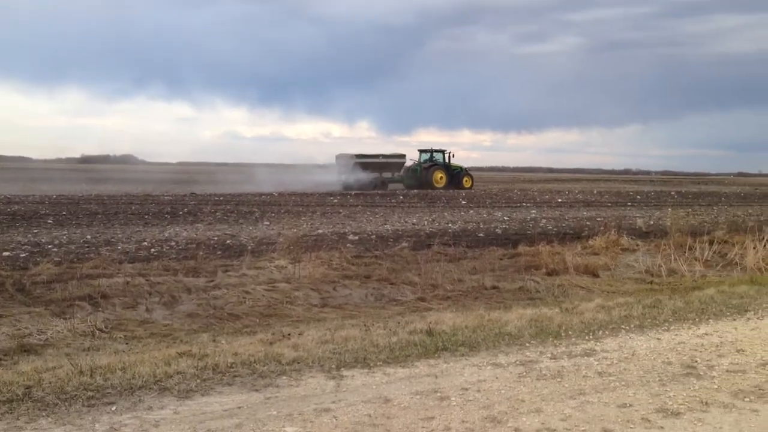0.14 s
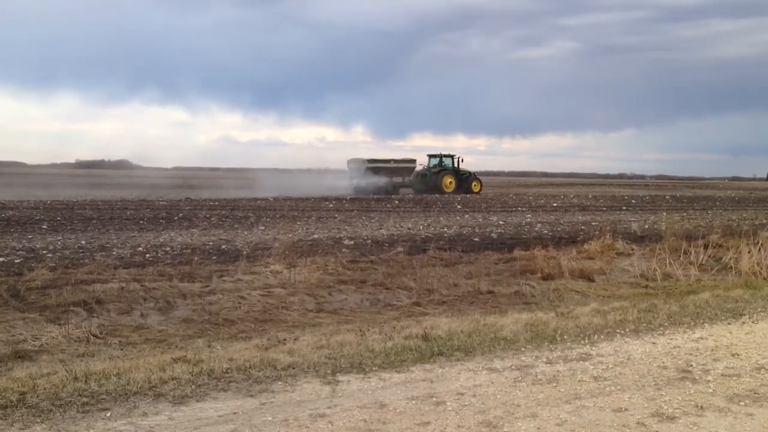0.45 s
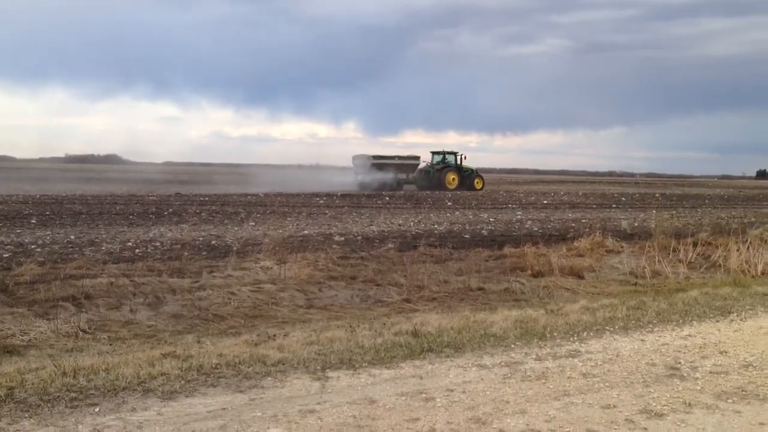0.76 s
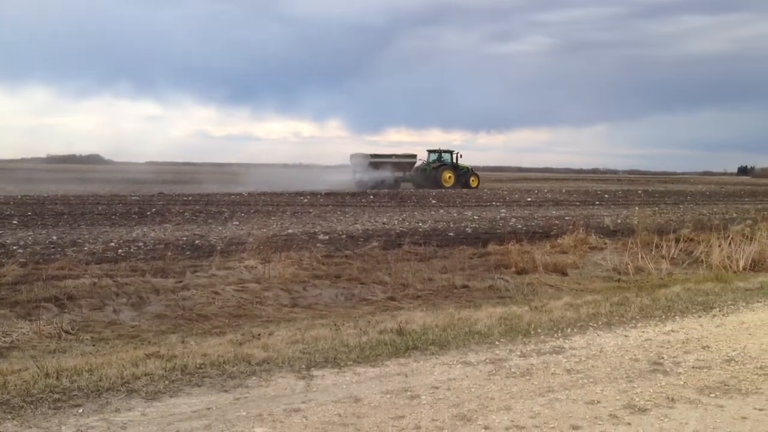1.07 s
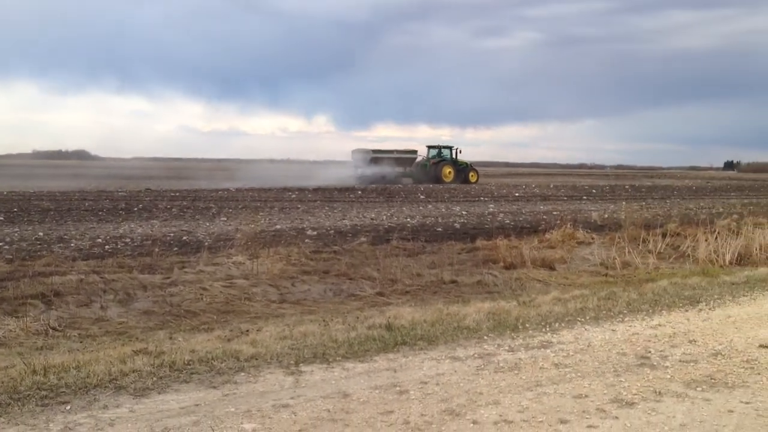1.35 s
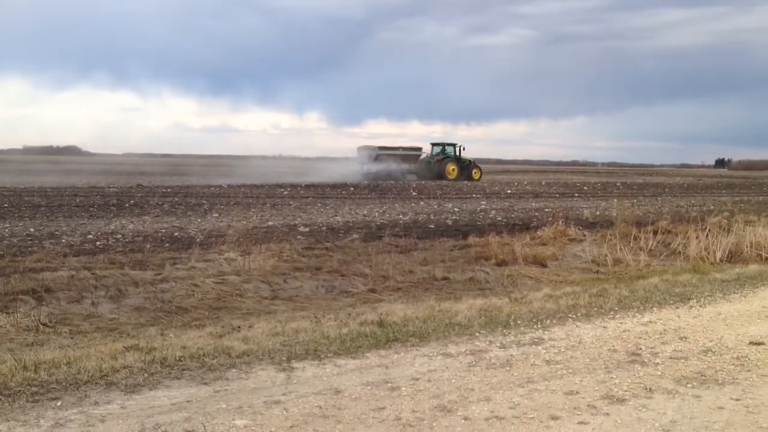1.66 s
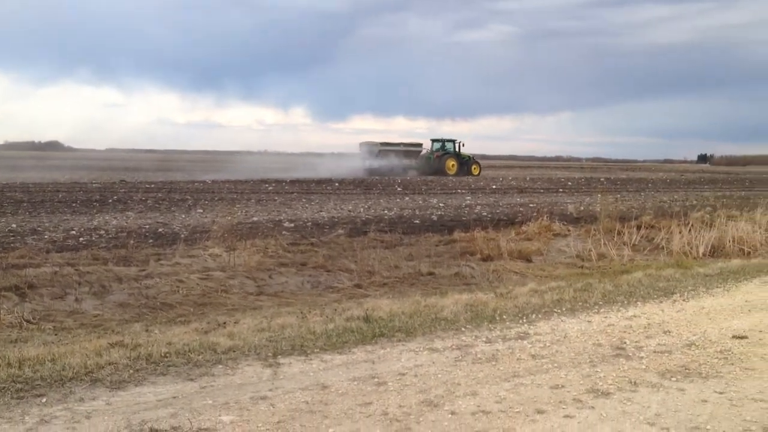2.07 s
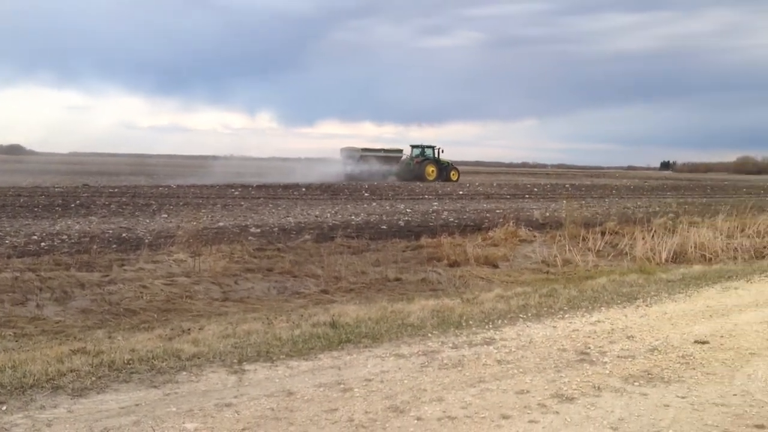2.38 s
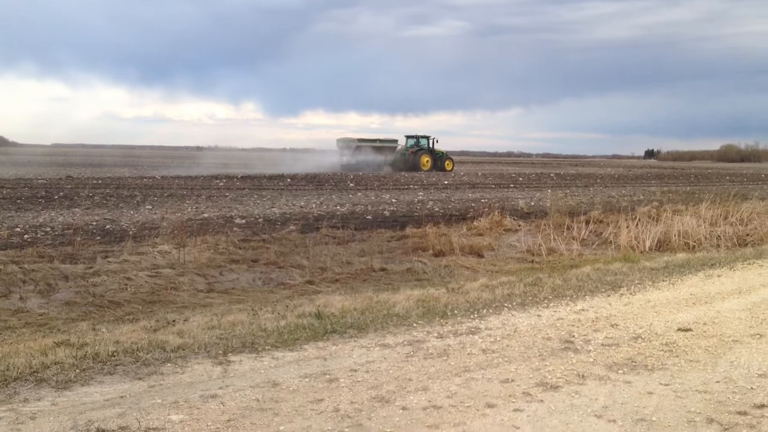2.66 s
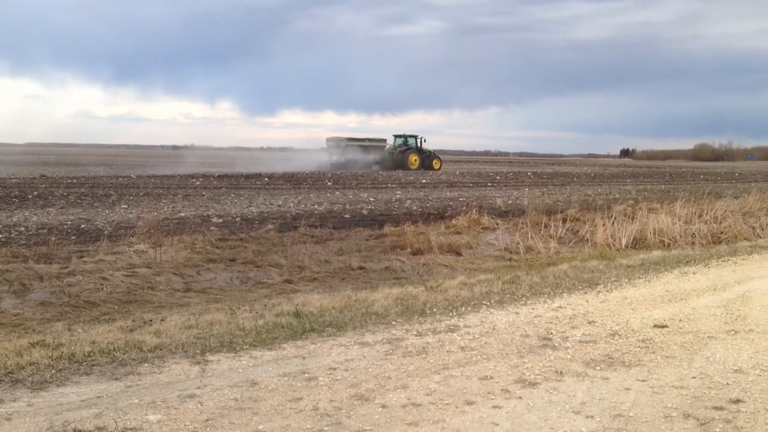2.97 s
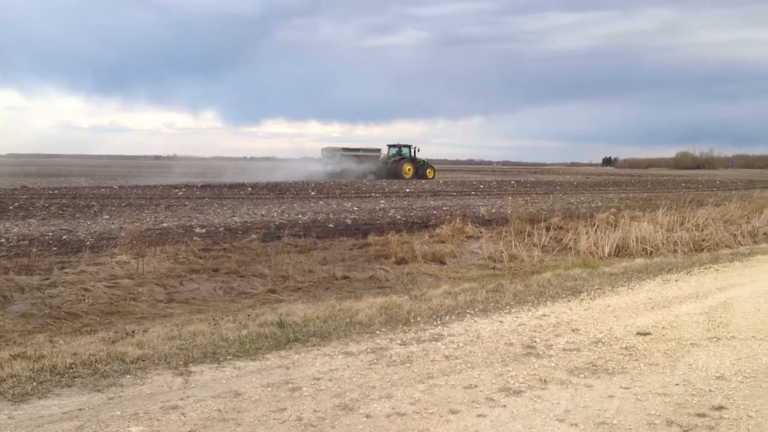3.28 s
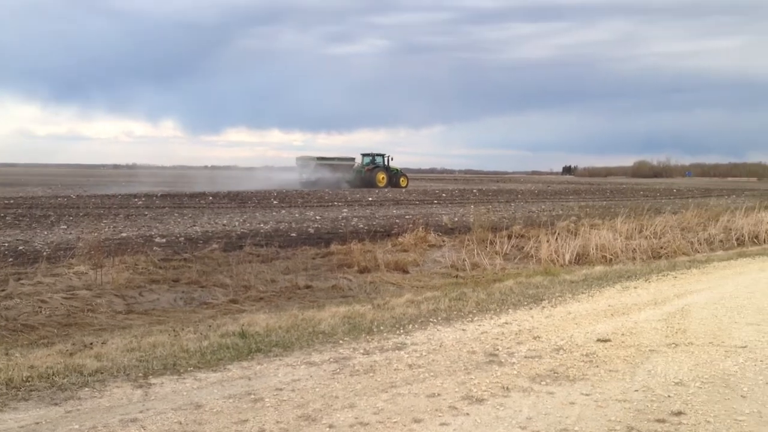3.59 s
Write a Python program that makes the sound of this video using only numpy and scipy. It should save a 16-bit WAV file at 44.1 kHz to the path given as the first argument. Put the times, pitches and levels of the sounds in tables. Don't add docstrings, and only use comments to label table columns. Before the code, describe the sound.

Steady wavering tractor engine roar heard from a distance outdoors, with fluttering high gear whine and spinning-disc hiss from the towed spreader; irregular soft wind thumps knock the microphone throughout, with no echo.

```python
import sys
import numpy as np
from scipy import signal
from scipy.fft import rfft, irfft
from scipy.io import wavfile
from scipy.ndimage import uniform_filter1d

SR = 44100
rng = np.random.default_rng(int(sys.argv[2]) if len(sys.argv) > 2 else 0)


def makeup_ratio(level_db):
    decades = np.asarray(level_db, float) / 20
    return 10 ** decades


def int16_out(signal):
    q = np.round(np.clip(np.atleast_2d(signal).T, -1, 1) * 32767)
    wavfile.write(sys.argv[1], SR, q.astype(np.int16))


N = 164493

# t/s, level/dB
CARRY_DB = [(0.05, -37), (0.33, -37), (1.14, -37.5), (1.33, -38.5), (3.67, -39.5), (3.68, -39)]


def engine(speed):
    cycle_hz = 14.82
    # multiple of the cycle, level/dB
    orders = [(6, -71), (8, -78), (9, -45.5), (10, -48), (11, -54.5), (12, -44.5), (15, -60), (24, -70.5)]
    # t/s, level/dB, tilt toward the upper orders/dB
    exhaust = [(0, -4, -12), (.15, -4, 0.5), (.35, -5.5, 6), (.6, -3, -3), (.8, 2.5, -1.5), (1.0, -1, -0.5),
               (1.25, -3, -1.5), (1.5, 3.5, 0.5), (1.75, -3, 2.5), (1.95, -1, -1.5), (2.15, -1.5, -4),
               (2.4, 2, -2), (2.65, -4, -0.5), (2.85, -2.5, -7), (3.05, 0, -6), (3.25, 3.5, 2),
               (3.5, 1.5, -3), (3.73, 2, 4.5)]
    # f/Hz, density/dB per Hz
    rumble_colour = [(15, -72), (25, -35), (70, -15.5), (108, -3), (146, 7.5), (211, 6), (252, -3.5),
                     (301, -10.5), (520, -16), (680, -70), (1140, -120)]
    # f/Hz, density/dB per Hz
    roar_colour = [(290, -7), (500, -14), (551, -10), (730, 0), (810, -0.5), (1000, 0.5), (1790, -5.5),
                   (2190, -2.5), (2950, -20.5), (3840, -35), (6490, -120)]
    time_s, note_db, tilt_db = np.array(exhaust).T

    def shift_db(order):
        tilted_db = note_db + tilt_db * np.clip((order - 10.5) / 1.5, -1, 1)
        return np.interp(np.arange(N) / SR, time_s, tilted_db)

    drone = sum(tone(cycle_hz * order * speed, db + shift_db(order), waver_db=1.5, blur_hz=1.503, rate_hz=15)
                for order, db in orders)
    rumble = bands(rumble_colour, -42.5, flicker_db=1.5, rate_hz=12, swell_db=-0.45)
    roar = bands(roar_colour, -40.5, flicker_db=0.82, rate_hz=6.71, swell_db=0.5)
    noise = rumble * makeup_ratio(0.2 * shift_db(11.4)) + roar
    return drone + dips(noise, [(510, 70, -4)])


def spreader(speed, t):
    # multiple, level/dB
    pump = [(1, -46), (2, -68), (3, -55.5), (4, -53), (5, -60)]
    # t/s, level/dB
    pump_load = [(0, -3), (1.3, -1.4), (1.75, -0.5), (2.4, -1.5), (3.0, -1.5), (3.2, -4), (3.73, -8.5)]
    # f/Hz, level/dB, drift/dB per s
    drive_line = [(715.6, -57, -.3), (1125.6, -57, -1.2), (1163, -61, .3), (1433, -64, .1), (1561, -59, .6),
                  (1672, -64, -.5), (1790, -60, -1.5), (2042, -63, .1), (2150, -63, .1), (2316, -62, .1)]
    # f/Hz, best level/dB, best heard t/s, fall/dB per s
    gear_whine = [(3104, -66, .9, 1.5), (3237, -57.5, .85, 7), (3630, -60, 1.9, 2), (3829, -61, 1.6, 2.5),
                  (4019, -60, 1.5, 2), (4417, -62.5, 1.6, 1), (4627, -67, 2, 1), (5050, -67, 3.65, 1.6),
                  (5270, -74, 2, 0), (5973, -74, .55, 1)]
    # start/s, length/s, level/dB
    high_bursts = [(0.317, 0.056, -55), (0.556, 0.12, -52), (0.694, 0.13, -53), (0.8, 0.09, -48.5),
                   (0.909, 0.057, -50.5), (1.015, 0.043, -49), (1.133, 0.043, -62), (1.185, 0.09, -53.5),
                   (1.358, 0.036, -68), (1.406, 0.061, -52.5), (1.49, 0.098, -49), (1.638, 0.051, -58),
                   (1.718, 0.029, -44.5), (1.777, 0.069, -53.5), (1.837, 0.047, -53), (1.889, 0.033, -68),
                   (1.929, 0.047, -56), (1.995, 0.043, -55), (2.105, 0.029, -66), (2.29, 0.05, -53),
                   (2.4, 0.072, -55), (2.498, 0.036, -66), (2.546, 0.04, -50.5), (2.661, 0.036, -56),
                   (2.75, 0.19, -51), (2.957, 0.042, -53), (3.087, 0.032, -51), (3.324, 0.032, -57),
                   (3.38, 0.047, -53.5), (3.452, 0.049, -50.5)]
    # start/s, length/s, level/dB
    low_bursts = [(0.01, 0.056, -52), (0.135, 0.051, -53), (0.23, 0.054, -57), (0.31, 0.033, -50),
                  (0.367, 0.047, -46.5), (0.495, 0.024, -42), (0.55, 0.029, -54), (0.605, 0.065, -46),
                  (0.69, 0.045, -52), (0.76, 0.048, -51), (.84, 0.051, -51), (.95, .05, -61),
                  (1.04, 0.073, -59), (1.217, 0.046, -53), (1.348, 0.032, -52), (1.5, 0.028, -48),
                  (1.558, 0.051, -49)]
    # start/s, length/s, level/dB
    thin_bursts = [
        (.6, 0.12, -68),
        (1.48, .09, -78),
        (2.27, .14, -71),
        (2.7, 0.27, -70),
        (2.96, 0.093, -62.5),
        (3.44, 0.084, -70),
    ]
    # f/Hz, density/dB per Hz
    disc_colour = [(1680, -40), (2850, -16.5), (3340, -1), (3840, -2.5), (4310, 0), (4850, -9.5),
                   (5910, -17), (6790, -27), (8000, -34), (10400, -46), (17600, -120)]
    # t/s, level/dB
    treble = [(0.05, -46.5), (0.45, -43), (2.02, -41), (2.2, -45), (2.92, -42), (2.93, -43), (3.68, -49)]

    pump_hz, load_db = 249.7, curve(pump_load)
    hum = sum(tone(pump_hz * k * speed, db + load_db / k, min(1.3 * k, 2.4), 1.3 * k, 10 + 6 * k)
              for k, db in pump)
    drive = sum(tone(hz * speed, db - 1.5 + drift * (t - t.mean()), 4, 4, 14) for hz, db, drift in drive_line)
    gears = sum(tone(hz * speed, db - fall * np.abs(t - best_s), 3, 9, 34)
                for hz, db, best_s, fall in gear_whine)

    high = tone(4211 * speed, bursts(high_bursts, -60.5, t), 1.8, 7, 52)
    low = tone(3447 * speed, bursts(low_bursts, -60 - 10 * t, t), 2, 8, 45)
    thin = tone(5731 * speed, bursts(thin_bursts, -79, t), 2, 9, 40)
    whines = (high + low + thin) / makeup_ratio(curve(CARRY_DB))

    discs = bands(disc_colour, -50, flicker_db=0.9, rate_hz=20, swell_db=0.3)
    top = signal.sosfiltfilt(signal.butter(3, 4900, "high", fs=SR, output="sos"), discs)
    treble_db = curve(treble)
    hiss = makeup_ratio(0.77 * treble_db) * (discs - top) + makeup_ratio(0.12 * treble_db) * top
    return hum + drive + whines + makeup_ratio(-0.1) * gears + hiss


def wind():
    # t/s, peak/dB, width/ms, push 1 or pull -1
    bumps = [(0.1933, -18.3, 1.35, 1), (0.4125, -22.5, 0.99, 1), (0.4802, -19, 0.84, -1),
             (0.5008, -17.5, 1.35, 1), (0.6919, -31, 0.63, -1), (0.7294, -24, 1.35, -1),
             (0.869, -19.5, 0.84, 1), (0.896, -17.5, 1, 1), (0.9043, -24, 1.2, 1), (0.9067, -26, 0.62, 1),
             (0.9254, -24, 0.94, 1), (0.9288, -17.5, 0.85, 1), (0.9369, -32.0, 0.4, 1),
             (0.9408, -27, 0.81, 1), (0.948, -18, 1.04, -1), (1.0661, -27.1, 0.68, -1),
             (1.1145, -18, 0.81, 1), (1.122, -27, 0.44, 1), (1.133, -20.5, 0.66, -1),
             (1.2569, -21, 0.97, 1), (1.5405, -25, 1.6, -1), (1.5773, -27, 0.98, -1), (1.5978, -33, 0.4, 1),
             (1.6639, -23, 1.2, -1), (1.6947, -27, 0.4, 1), (1.7128, -15, 0.9, -1), (1.7245, -33, 0.37, -1),
             (1.7615, -21, 1, 1), (1.785, -24, 0.88, 1), (1.7919, -24.2, 0.86, -1),
             (1.852, -22.5, 0.54, -1), (1.8549, -21, 1.2, -1), (1.8723, -21, 0.8, -1),
             (1.9233, -26.5, 0.7, 1), (2.3722, -41, 0.36, -1), (2.3751, -13.5, 0.9, -1),
             (2.3938, -25, 1.1, 1), (2.5422, -24, 1.1, -1), (2.5615, -26, 0.99, -1), (2.7094, -26, 0.75, 1),
             (2.7327, -21.5, 0.94, 1), (2.835, -18.5, 0.78, -1), (2.8809, -22, 0.8, 1),
             (3.3554, -20.5, 0.91, -1), (3.3935, -26, 1.2, 1), (3.4732, -21, 1.24, -1),
             (3.5571, -21, 1.9, 1), (3.6253, -19, 1.3, -1)]
    small_per_s, small_db, small_spread_db = 22, -40, 2.2
    gain_db, port_hz = -0.5, 130

    wait, strength, shape = rng.random((400, 3)).T
    small_s = np.cumsum(-np.log(1 - wait)) / small_per_s
    eddies = list(bumps)
    for s, a, b in zip(small_s, strength, shape):
        peak_db = small_db - small_spread_db * np.log(1 - a)
        eddies.append((s, peak_db, 0.5 + 0.5 * b, b % 0.1 - 0.05))

    press, near = np.zeros(N + 2000), np.arange(-400, 400)
    for s, db, width_ms, push in eddies:
        at = s * SR
        if at < N:
            x = (near - at % 1) / (max(width_ms, 0.38) * SR / 1000)
            press[int(at) + near] += np.sign(push) * makeup_ratio(db + gain_db) * np.exp(-x ** 2 / 2)
    quick = press[:N] - uniform_filter1d(press, int(SR / 90))[:N]
    return signal.sosfilt(signal.butter(4, port_hz, "high", fs=SR, output="sos"), quick)


def tone(hz, db, waver_db, blur_hz, rate_hz):
    phase = 2 * np.pi * np.cumsum(hz + blur_hz * walk(rate_hz)) / SR + 2 * np.pi * rng.random()
    gain = makeup_ratio(waver_db * walk(rate_hz))
    gain = gain / np.sqrt(np.mean(gain ** 2))
    return np.sqrt(2) * makeup_ratio(db) * gain * np.sin(phase)


def bands(colour, db, flicker_db, rate_hz, swell_db):
    f = np.fft.rfftfreq(N, 1 / SR) + 1
    hz, per_hz_db = np.array(colour).T
    shape = makeup_ratio(np.interp(np.log(f), np.log(hz), per_hz_db, left=-200, right=-200))
    noise = rfft(rng.standard_normal(N)) * shape
    out, shared = 0, walk(4.5)
    for centre in np.arange(np.log2(20), np.log2(SR / 2), 1 / 3):
        if hz[0] / 1.3 < 2 ** centre < hz[-1] * 1.3:
            window = np.cos(np.pi / 2 * np.clip(3 * (np.log2(f) - centre), -1, 1)) ** 2
            shared = 0.8 * shared + 0.6 * walk(2.5)
            out = out + irfft(noise * window, N) * makeup_ratio(swell_db * shared + flicker_db * walk(rate_hz))
    return level(out, db)


def bursts(table, rest_db, t):
    db = rest_db + 0 * t
    for start_s, length_s, top_db in table:
        db = np.where((t >= start_s) & (t < start_s + length_s), top_db, db)
    return uniform_filter1d(db, int(0.024 * SR))


def curve(table):
    db = np.interp(np.arange(N) / SR, *np.array(table).T)
    return db - db.mean()


def walk(rate_hz):
    k = int(SR / rate_hz)
    held = np.repeat(rng.standard_normal(200), k)[:N + k]
    slewed = uniform_filter1d(uniform_filter1d(held, k), k)
    return 1.3 * slewed[k // 2:k // 2 + N]


def level(x, db):
    return x * makeup_ratio(db) / np.sqrt(np.mean(x ** 2))


def dips(x, table):
    f = np.fft.rfftfreq(N, 1 / SR)
    cut_db = sum(db * np.exp(-0.5 * ((f - hz) / width_hz) ** 2) for hz, width_hz, db in table)
    return irfft(rfft(x) * makeup_ratio(cut_db), N)


def gaps(x):
    # f/Hz, width/Hz, level when open/dB
    gap_table = [(6250, 30, -7), (6600, 40, -12), (6830, 45, -20), (7150, 35, -9), (7400, 80, -24),
                 (7600, 45, -14)]
    rate_hz, threshold = 14, 0.35
    for dip in gap_table:
        opening = np.clip(2 * (walk(rate_hz) - threshold), 0, 1)
        x = x + opening * (dips(x, [dip]) - x)
    return x


def scene():
    t = np.arange(N) / SR
    speed = 1 + 0.0004 * walk(1.2)
    far = engine(speed) + spreader(speed, t)
    return (far * makeup_ratio(curve(CARRY_DB)) + wind())[None]


def top_cut(x):
    return signal.sosfilt(signal.butter(12, 16350, fs=SR, output="sos"), x)


def record(dry):
    # f/Hz, density/dB per Hz
    hiss_colour = [(4410, -36), (7500, -16), (14700, -1), (15600, -3), (16000, -27)]
    hiss = bands(hiss_colour, -78.5, flicker_db=0.2, rate_hz=9, swell_db=0.1)
    low_pass = signal.ellip(12, 0.2, 60, 15300, fs=SR, output="sos")
    return top_cut(signal.sosfilt(low_pass, gaps(dry + hiss)))


dry = scene()
out = record(dry)
int16_out(out)
```